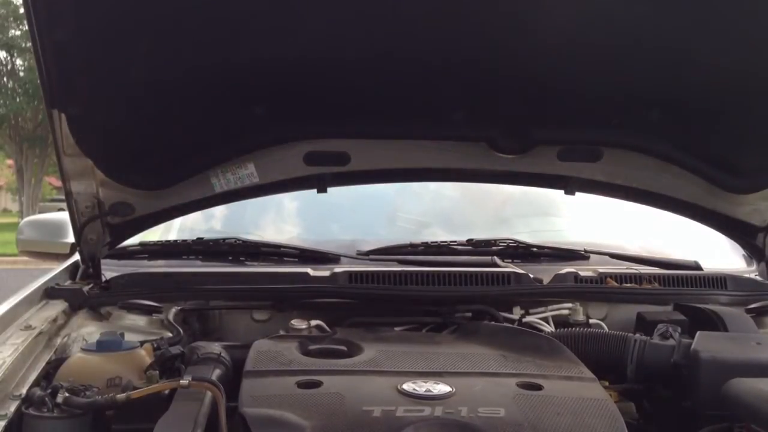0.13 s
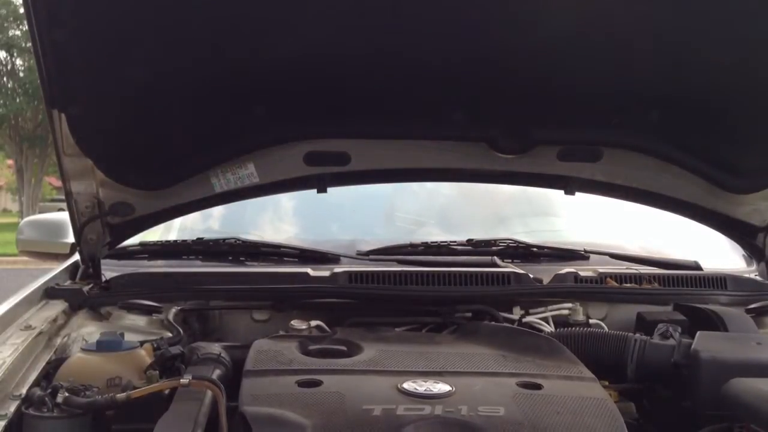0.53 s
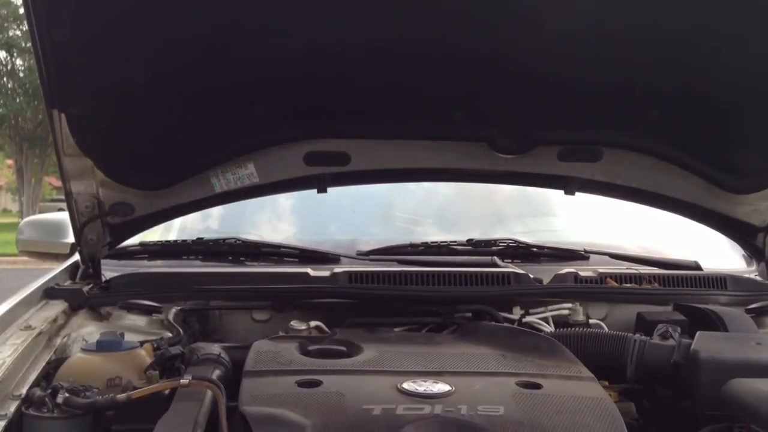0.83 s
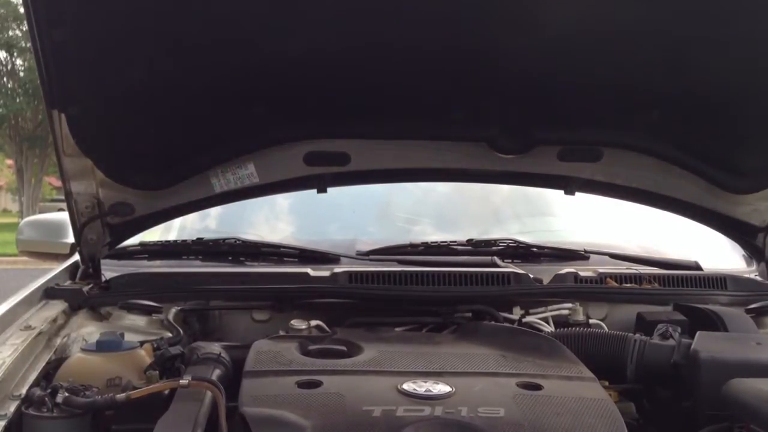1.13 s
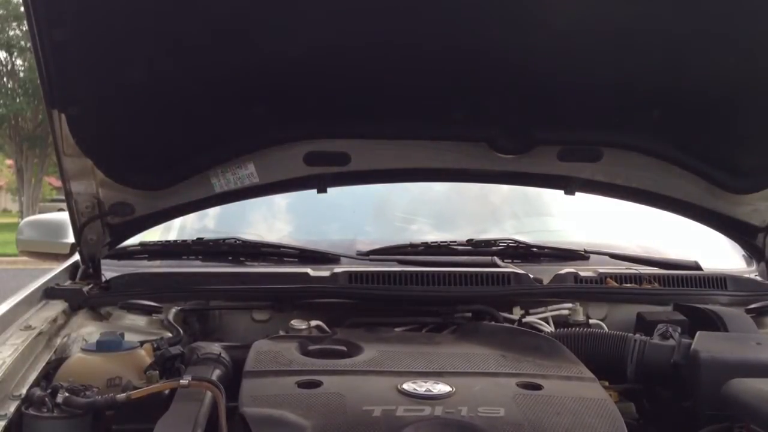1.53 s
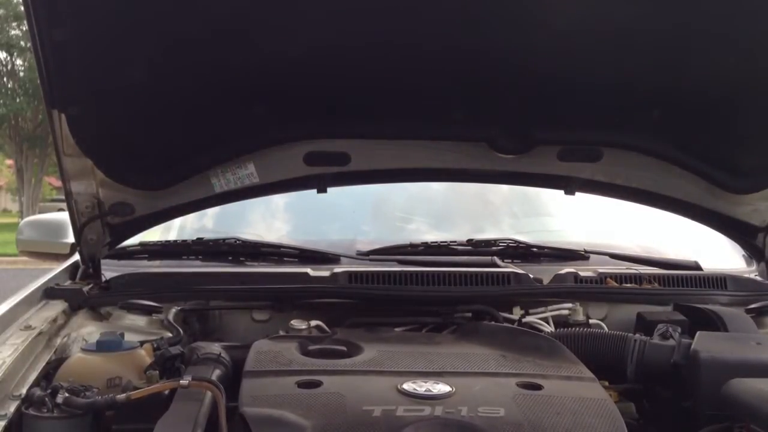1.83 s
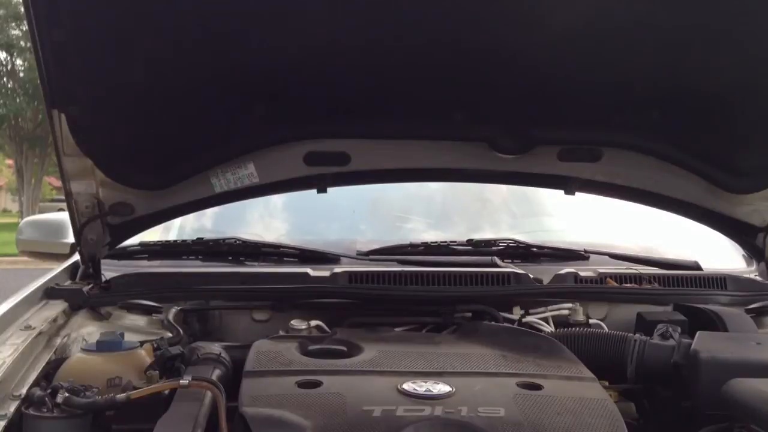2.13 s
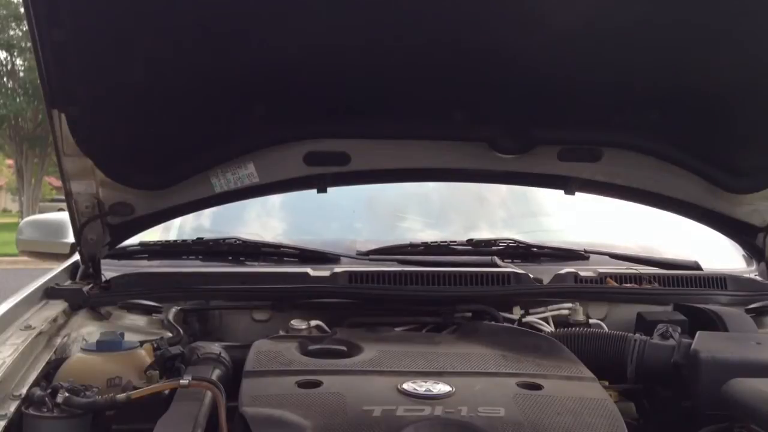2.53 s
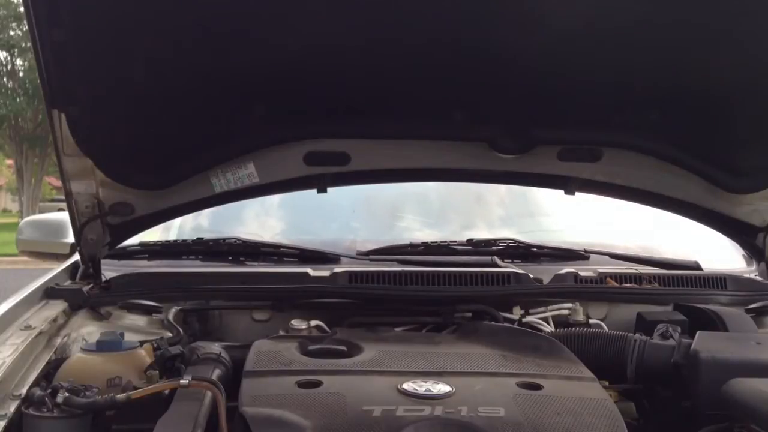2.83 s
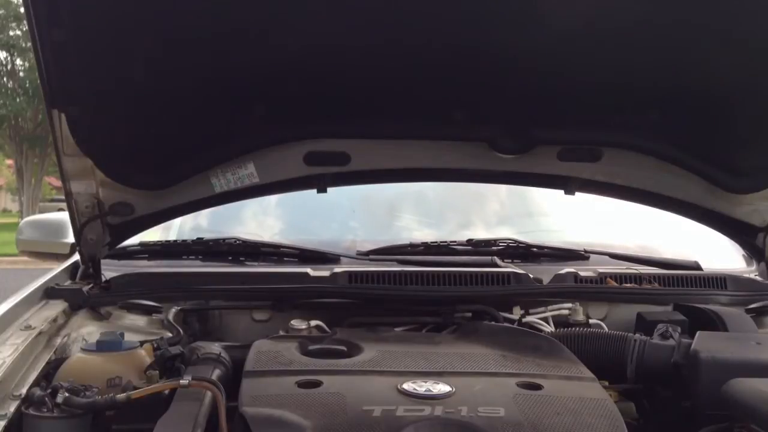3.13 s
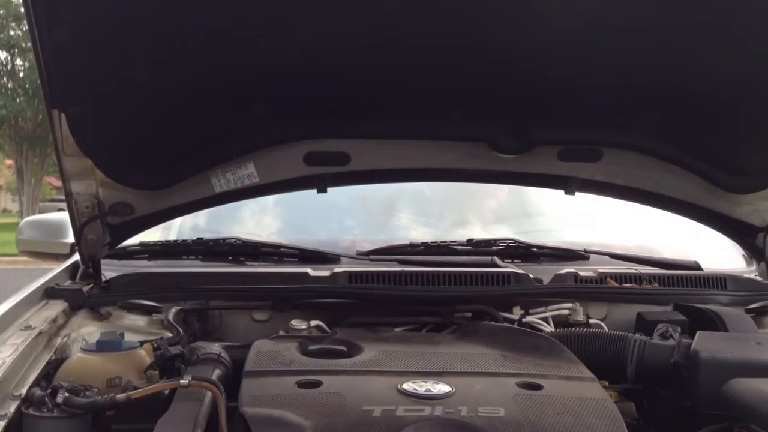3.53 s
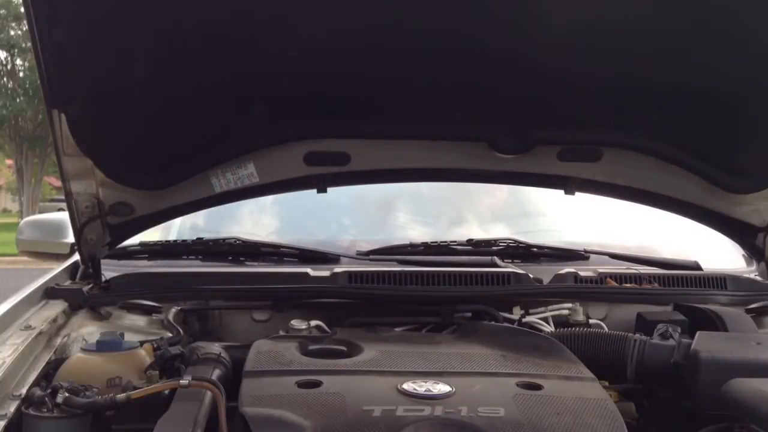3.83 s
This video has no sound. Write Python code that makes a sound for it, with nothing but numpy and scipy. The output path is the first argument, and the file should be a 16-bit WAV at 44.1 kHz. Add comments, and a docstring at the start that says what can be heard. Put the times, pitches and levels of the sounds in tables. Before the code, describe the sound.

A diesel car engine knocks close by, slowing until it stalls with a thin belt squeak and a jolt at about 0.6 seconds. At once the starter grinds in a loud, ringing metallic whir that runs down and stops short at 2 seconds. A latch clicks near 2.8 seconds. From about 2.5 seconds a small bird chirps very faintly over a quiet, distant outdoor hum.

```python
"""Diesel stall and grinding starter.

A four-cylinder diesel under an open bonnet knocks ever more slowly and stalls with a belt squeak
and a last jolt. The starter's teeth then grind on the ring gear, ringing the housing in a loud whir
that runs down and stops short; a latch clicks. A small bird calls over a low, distant hum."""
import sys
import numpy as np
from scipy import signal
from scipy.fft import rfft, irfft
from scipy.io import wavfile
from scipy.ndimage import uniform_filter1d

SR = 44100
rng = np.random.default_rng(int(sys.argv[2]) if len(sys.argv) > 2 else 0)


def store_pcm(level_fs):
    """Save levels as 16-bit WAV."""
    pcm = np.round(np.clip(level_fs, -1, 1) * 32767).astype(np.int16)
    wavfile.write(sys.argv[1], SR, np.atleast_2d(pcm).T)


N = 176400
TIME_S = np.arange(N) / SR


def amp(db):
    """Decibels to gain."""
    return 10 ** (np.asarray(db) / 20)


def unit(x):
    """Scale to rms 1."""
    return x / np.sqrt(np.mean(x ** 2))


def noise():
    """White noise."""
    return rng.standard_normal(N)


def walk(rate_hz):
    """Smooth random drift, rms 1."""
    step = max(int(SR / rate_hz), 1)
    held = np.repeat(rng.standard_normal(N // step + 1), step)
    return unit(uniform_filter1d(held, step)[:N])


def curve(rows, column=1):
    """Table column, linearly interpolated in time."""
    rows = np.array(rows, float)
    return np.interp(TIME_S, rows[:, 0], rows[:, column])


def swell(at_s, rise_s, fall_s):
    """Exponential rise to a peak, then exponential decay."""
    t = TIME_S - at_s
    return np.exp(np.minimum(t / rise_s, -t / fall_s))


def fade_out(at_s, over_s=.039):
    """Smooth step from 1 to 0."""
    return .5 - .5 * np.tanh((TIME_S - at_s) / (2 * over_s))


def cycles(hz, waver, waver_hz):
    """Running cycle count of a frequency that drifts by the fraction `waver`."""
    return np.cumsum(hz * (1 + waver * walk(waver_hz))) / SR


def sine(turns):
    """Sine of a phase in cycles, rms 1."""
    return unit(np.sin(2 * np.pi * turns))


def clatter(per_s=5000, scatter_db=4.5):
    """Dense small impacts of uneven size."""
    impacts = (rng.random(N) < per_s / SR) * np.sign(noise())
    return unit(impacts * amp(scatter_db * noise()))


def cut(x, hz, kind):
    """Butterworth high-pass or low-pass."""
    return signal.sosfilt(signal.butter(4, hz, kind, fs=SR, output="sos"), x)


def through(x, response):
    """Convolve with an impulse response scaled to unit energy."""
    return signal.fftconvolve(x, response / np.linalg.norm(response))[:N]


def colour(x, points, size=4096):
    """Minimum-phase filter through (frequency [Hz], relative gain [dB]) points, rolled off below."""
    hz, db = np.array(points, float).T
    f = np.maximum(np.arange(size // 2 + 1) * SR / size, 1)
    gain = amp(np.interp(np.log(f), np.log(hz), db)) * np.minimum(f / hz[0], 1) ** 3
    cepstrum = irfft(np.log(gain + 1e-6))
    cepstrum[1:size // 2] *= 2
    cepstrum[size // 2:] = 0
    return through(x, irfft(np.exp(rfft(cepstrum))))


def ring(x, modes):
    """Drive damped (frequency [Hz], width [Hz], relative gain [dB]) modes."""
    t = TIME_S[:SR // 3]
    response = sum((-1) ** k * amp(db) * width * np.exp(-np.pi * width * t) * np.sin(2 * np.pi * hz * t)
                   for k, (hz, width, db) in enumerate(modes))
    return through(x, response)


def ringing_noise(modes):
    """Noise-driven modes, rms 1."""
    return unit(ring(noise(), modes))


def band(hz, width_hz):
    """One noise-driven resonance, rms 1."""
    return ringing_noise([(hz, width_hz, 0)])


def echoes(x, t60_s, wet_db):
    """Direct sound plus a dense decaying tail of reflections."""
    t = TIME_S[:SR // 2]
    tail = noise()[:len(t)] * np.exp(-np.log(1000) * t / t60_s) * (t > .002)
    return (x + amp(wet_db) * through(x, tail)) / np.hypot(1, amp(wet_db))


def engine_bay(impacts, t60_s=.052, wet_db=-.5):
    """The bay smears each impact into its own short burst of reflections."""
    fade = np.exp(-2 * np.log(1000) * TIME_S[:SR // 4] / t60_s)
    energy = np.abs(signal.fftconvolve(impacts ** 2, fade / fade.sum())[:N])
    return (impacts + amp(wet_db) * np.sqrt(energy) * noise()) / np.hypot(1, amp(wet_db))


# open-air spectrum (frequency [Hz], gain [dB])
AIR_SPECTRUM = [(30, -28.5), (70, -8), (120, -10.5), (200, -4), (340, -3), (460, -4.5), (800, -10),
                (1900, -18), (4300, -21), (5000, -23), (15000, -27)]
# distant hum (frequency [Hz], width [Hz], level [dB])
DISTANT_HUM = [(162.5, 6.8, -60.5), (228.5, 7.5, -60.5)]


def outdoors(air_db=-60, flicker_db=.6):
    """Open-air rumble with a wavering two-note hum."""
    air = amp(air_db - flicker_db * walk(4.5)) * colour(noise(), AIR_SPECTRUM)
    hum = sum(amp(db) * unit(cut(band(hz, width), 120, "high")) for hz, width, db in DISTANT_HUM)
    return air + hum


# calls (time [s], length [s], start pitch [Hz], target pitch [Hz], level [dB])
BIRD_CALLS = [(2.47, .085, 2650, 3380, -63.5), (2.615, 0.12, 2570, 3480, -61),
              (2.86, 0.05, 4270, 3950, -67), (3.03, .06, 4550, 4250, -65.5),
              (3.285, .055, 4500, 4050, -66.5), (3.47, 0.061, 4450, 4250, -66.5),
              (3.65, 0.058, 4500, 4170, -65), (3.835, 0.064, 4510, 4150, -67)]


def bird(glide=.39, rasp=.033):
    """Two rising calls, then short falling chips, raspy and blurred by trees and walls."""
    song = np.zeros(N)
    for at, length, start_hz, target_hz, db in BIRD_CALLS:
        progress = np.clip((TIME_S - at) / length, 0, 1)
        hz = target_hz + (start_hz - target_hz) * np.exp(-progress / glide)
        song += amp(db) * np.sin(np.pi * progress) * np.sin(2 * np.pi * cycles(hz, rasp, 700))
    return echoes(song, t60_s=.25, wet_db=-2.5)


# clicks (time [s], body [dB], tick [dB], decay [s], ring [dB])
LATCH_CLICKS = [(2.755, -54, -65, 0.013, -55), (2.7922, -37, -54, 0.014, -44),
                (2.821, -60, -53, 0.017, -75)]
# latch body (frequency [Hz], gain [dB])
LATCH_SPECTRUM = [(200, -14), (330, 4.5), (450, -4), (620, 6), (850, -18), (1300, -15), (1720, -8),
                  (2200, -10), (2800, -4.5), (3900, -7.5), (4600, -4), (5300, -17), (6500, -21)]
# latch metal (frequency [Hz], width [Hz], gain [dB])
LATCH_MODES = [(1734, 45, -7), (4110, 90, -2), (4660, 51, -2)]


def latch(rise_s=.00035, rattle_db=-15, rattle_s=.026, ring_s=.0092):
    """A soft touch, a sharp click with a short metallic ring, and a bright rebound."""
    body, tick, metal = np.zeros((3, N))
    for at, body_db, tick_db, decay_s, ring_db in LATCH_CLICKS:
        strike = swell(at, rise_s, decay_s)
        body += amp(body_db) * (strike + amp(rattle_db) * swell(at, rise_s, rattle_s))
        tick += amp(tick_db) * strike
        metal += amp(ring_db) * swell(at, rise_s, ring_s)
    return (metal * ringing_noise(LATCH_MODES)
            + cut(colour(body * noise(), LATCH_SPECTRUM), 5430, "low")
            + colour(tick * noise(), [(7500, 0), (10500, -1), (15000, -9)]))


# panel hum (time [s], level [dB])
PANEL_LEVEL = [(1.1, -90), (1.24, -40), (1.3, -35), (1.37, -39), (1.45, -60), (1.6, -40), (1.7, -40),
               (1.8, -90)]


def panel(pitch_hz=736):
    """A panel hums at its own pitch while the gear coasts."""
    return amp(curve(PANEL_LEVEL)) * sine(cycles(pitch_hz, waver=.01, waver_hz=100))


# belt squeak (time [s], pitch [Hz], level [dB])
BELT_SQUEAK = [(.36, 5800, -66), (.41, 5755, -44), (.5, 5680, -42), (.57, 5660, -37.5), (.6, 5600, -56.5),
               (.62, 5660, -100)]
# whine of the belt-driven parts (time [s], pitch [Hz], level [dB])
BELT_WHINE = [(0, 409.6, -40.5), (.07, 399, -29), (.15, 367.3, -37), (.2, 340.2, -48.5), (.3, 297, -38.5),
              (.45, 240, -59.5), (.55, 205, -100)]


def belt(octave_db=-15):
    """The belt drive whines down and squeaks unsteadily as it drags to a halt."""
    turns = cycles(curve(BELT_SQUEAK), waver=.009, waver_hz=700)
    squeak = unit(sine(turns) + amp(octave_db) * sine(2 * turns))
    whine = sine(cycles(curve(BELT_WHINE), waver=.043, waver_hz=90))
    return amp(curve(BELT_SQUEAK, column=2)) * squeak + amp(curve(BELT_WHINE, column=2)) * whine


# block on its mounts (time [s], level [dB])
MOUNT_THUMPS = [(.1, -37.5), (.135, -36), (.215, -41), (.25, -35), (.375, -45), (.52, -42), (.587, -33),
                (.612, -33.5), (.825, -33.5)]
# loose parts (time [s], pitch [Hz], width [Hz], level [dB])
LOOSE_CLUNKS = [(.267, 905, 70, -23), (.313, 2650, 250, -25.5), (.346, 2400, 500, -40),
                (.442, 1200, 300, -37.5), (.459, 1200, 250, -27), (.503, 1300, 300, -35),
                (.509, 2700, 400, -33.5), (.532, 1200, 300, -26), (.61, 1300, 611.4, -28)]


def mounts(thump_hz=182.6, thump_width_hz=38):
    """The stalling block rocks: its mounts thump and loose parts clunk."""
    force = sum(amp(db) * swell(at, rise_s=.009, fall_s=.025) for at, db in MOUNT_THUMPS)
    thumps = force * unit(cut(band(thump_hz, thump_width_hz), 115, "high"))
    clunks = sum(amp(db) * swell(at, rise_s=.0034, fall_s=.0091) * band(hz, width)
                 for at, hz, width, db in LOOSE_CLUNKS)
    return thumps + clunks


# final clack (frequency [Hz], gain [dB])
CLACK_SPECTRUM = [(250, -15), (700, 6), (1400, 3), (2800, 1), (3700, -12), (5200, -3), (7500, -28),
                  (10000, -11), (12000, -34)]


def gear_stop(squeal_db=-46, clack_db=-39.5):
    """The slowing gear squeals thinly, then comes to rest with a dry clack."""
    squeal = amp(squeal_db) * swell(at_s=1.921, rise_s=.04, fall_s=.013) * band(9200, width_hz=160)
    clack = amp(clack_db) * swell(at_s=2.028, rise_s=.006, fall_s=.013) * noise()
    return squeal + colour(clack, CLACK_SPECTRUM)


# singing of the gear (time [s], level [dB])
SINGING_LEVEL = [(.62, -75), (.66, -26.5), (.75, -27.5), (.85, -29.5), (.9, -27), (.97, -25.5), (1.06, -27),
                 (1.115, -24), (1.142, -25.5), (1.165, -19), (1.18, -26), (1.2, -35), (1.5, -45),
                 (1.84, -38.5), (1.875, -36), (1.9, -47), (2.07, -100)]
# singing modes (frequency [Hz], gain [dB])
SINGING_MODES = [(1260, -2.5), (1932, -8)]
# growl of the first, hardest contact (time [s], level [dB])
GROWL_LEVEL = [(.63, -70.5), (.66, -23.5), (.74, -22.5), (.83, -23), (.88, -25.5), (.93, -26.5),
               (1.08, -27), (1.17, -34.5), (1.2, -51), (1.25, -100)]
# growl modes (frequency [Hz], width [Hz], gain [dB])
GROWL_MODES = [(590, 55, -7.5), (990, 64, 1.5), (1041, 30, -7), (1330, 45, -4), (1670, 30, -7),
               (1940, 35, 2.5), (2292, 42, -3.5), (2600, 50, -5.5), (2690, 30, -1.5), (2830, 37, -4.5),
               (3073, 25, -3), (3213, 40, -4.5), (4260, 120, -10), (5084, 270, -14.5)]
# hiss of the spinning gear (time [s], level [dB])
HISS_LEVEL = [(.61, -91.5), (.65, -38.5), (1, -40), (1.3, -48), (1.6, -48), (1.85, -56), (1.92, -60),
              (1.97, -74), (2.07, -100)]
# hiss modes (frequency [Hz], width [Hz], gain [dB])
HISS_MODES = [(6980, 110, -2.5), (6980, 70, -4.5), (9060, 200, -0.5), (10050, 400, -7.5)]


def gear_singing(flutter_db=2.5):
    """Rubbing sustains the gear's modes, each wavering on its own, over a growl and a metallic hiss."""
    tones = np.zeros(N)
    for hz, db in SINGING_MODES:
        tone = sine(cycles(hz, waver=.008, waver_hz=200))
        tones += amp(db + flutter_db * walk(160)) * tone
    growl = amp(curve(GROWL_LEVEL)) * ringing_noise(GROWL_MODES)
    hiss = amp(curve(HISS_LEVEL)) * ringing_noise(HISS_MODES)
    return amp(curve(SINGING_LEVEL)) * unit(tones) + growl + hiss


# engine-bay cavities (frequency [Hz], width [Hz], gain [dB])
CAVITY_MODES = [(576, 41, -2.5), (774, 12, -3.5)]


def cavity_boom(teeth, hits, force, jitter_teeth=.09, force_limit_db=-31.5):
    """Mesh harmonics and tooth hits sound the bay's cavities until the mesh is slow."""
    harmonics = sum(sine(k * (teeth + jitter_teeth * walk(150))) for k in (2, 3))
    boom = amp(-10.5) * unit(ring(harmonics, CAVITY_MODES))
    rumble = amp(-14) * ring(hits, CAVITY_MODES)
    return np.minimum(force, amp(force_limit_db)) * (boom + rumble) * fade_out(at_s=1.856)


# hum at the tooth rate (time [s], level [dB])
MESH_LEVEL = [(.61, -72), (.635, -35), (.68, -25.5), (.705, -30.5), (.76, -24.5), (.8, -36.5), (.83, -23),
              (.86, -46), (.885, -33), (.905, -27), (.955, -31), (.98, -26.5), (1.01, -32), (1.085, -26),
              (1.13, -30), (1.22, -36), (1.5, -38.5), (1.66, -38), (1.795, -49), (1.82, -38), (1.895, -39),
              (1.915, -53), (2.07, -92)]
# its third harmonic (time [s], level [dB])
THIRD_LEVEL = [(1.4, -90), (1.5, -39), (1.62, -44), (1.67, -35), (1.71, -37.5), (1.755, -33.5),
               (1.785, -54), (1.84, -55), (1.87, -45), (1.91, -43), (1.93, -68), (2.07, -100)]


def mesh_hum(teeth, flutter_db=1.5, jitter_teeth=.025):
    """The mesh hums at the tooth rate; its third harmonic stands out as the gear coasts."""
    hum = amp(curve(MESH_LEVEL) + flutter_db * walk(90)) * sine(teeth)
    third = amp(curve(THIRD_LEVEL)) * sine(3 * (teeth + jitter_teeth * walk(150)))
    return hum + third


# starter speed (time [s], tooth rate [Hz])
TOOTH_RATE = [(.62, 320), (.68, 324), (.745, 366), (.79, 317), (.825, 347), (.87, 307), (.93, 330),
              (.975, 325), (1.04, 320), (1.13, 314), (1.2, 302), (1.26, 305), (1.45, 301), (1.55, 274),
              (1.65, 270), (1.77, 237), (1.83, 196), (1.885, 203), (1.915, 176), (2.06, 129)]
# grinding force (time [s], level [dB])
GRIND_FORCE = [(.61, -90), (.632, -25), (.652, -20), (.8, -20), (.9, -21.5), (1.08, -21.5), (1.14, -24.5),
               (1.165, -22.5), (1.19, -24.5), (1.45, -25), (1.68, -27), (1.78, -31), (1.88, -34.5),
               (1.95, -37.5), (2.01, -43.5), (2.045, -44.5), (2.07, -79), (2.1, -110)]
# ring gear and bell housing (frequency [Hz], width [Hz], gain [dB])
HOUSING_MODES = [(908, 56, -8.5), (996, 27, -3.5), (1031.5, 30, -3.5), (1217, 37, 1.5), (1361, 30, -7),
                 (1478, 35, -2), (1703, 42, -3), (1973, 40, -3), (2023, 36, -2.5), (2303, 86, 1),
                 (2615, 26, -3.5), (2707, 24, -3.5), (2872, 40, -5.5), (3090, 23, -6.5), (3205, 32, -9),
                 (4240, 81, -16.5), (4800, 70, -12), (5270, 50, -9)]
# tooth scrape (frequency [Hz], gain [dB])
SCRAPE_SPECTRUM = [(130, -28.5), (190, -20.5), (330, -7.5), (480, -15), (680, -14.5), (1100, -5),
                   (1800, -9), (2700, -10.5), (3500, -15), (5200, -14), (6400, -18.5), (9600, -22.5),
                   (11500, -28), (15000, -37.5)]


def starter(jitter_teeth=.16, flutter_db=.7, chatter_db=7.5, housing_db=-2, scrape_db=-3.5):
    """Teeth strike and chatter on the ring gear and ring the housing; the last slow ones only scrape."""
    teeth = cycles(curve(TOOTH_RATE), waver=.028, waver_hz=120)
    uneven_teeth = np.maximum.accumulate(teeth + jitter_teeth * walk(300))
    hits = unit(np.diff(np.floor(uneven_teeth), prepend=0) > 0)
    force = amp(curve(GRIND_FORCE) + flutter_db * walk(50))
    blows, rasp = (force * unit(hits + amp(chatter_db) * clatter(per_s=2500, scatter_db=1.5))
                   for _ in range(2))
    housing = amp(housing_db) * ring(blows * fade_out(at_s=2), HOUSING_MODES)
    scrape = amp(scrape_db) * colour(engine_bay(rasp), SCRAPE_SPECTRUM)
    return housing + scrape + mesh_hum(teeth) + cavity_boom(teeth, hits, force)


# compression strokes (time [s], level [dB], relative treble [dB], relative ring [dB], knock decay [s])
STROKES = [(.003, -13.5, -5.5, -6.5, 0.0089), (0.033, -21, -4, -8.5, 0.0073), (0.062, -16, -5, 1, 0.0072),
           (0.092, -16.5, -2, -8.5, 0.018), (0.121, -16.5, 0.5, -2.5, 0.0071), (0.149, -17.5, 3, 1.5, .01),
           (0.178, -20, -8, 3, 0.013), (0.211, -20.5, 5, 7.5, 0.0049), (0.245, -18.5, -3.5, -1, .01),
           (0.282, -25, 5, 4.5, 0.005), (.318, -21, 0, 2, 0.019), (0.359, -23.5, -1, 9, 0.011),
           (0.406, -21.5, 1, 2.5, 0.0089), (0.458, -18.5, -7.5, 2.5, 0.011),
           (0.519, -19.5, -4.5, -2, 0.0079), (.581, -12.5, -7, 2, 0.0098)]
# valve gear and belts between strokes (time [s], level [dB])
CHURN_LEVEL = [(0, -22), (.15, -28.5), (.3, -27.5), (.45, -28.5), (.55, -32.5), (.62, -27.5), (.68, -48),
               (.72, -100)]
# impacts in the block (frequency [Hz], gain [dB])
BLOCK_SPECTRUM = [(59, -50.5), (100, -19.5), (176, -9), (274, -9.5), (375, -2), (482, -4.5), (535, -2.5),
                  (748, -4), (831, -6.5), (983, 1), (1140, -5.5), (1240, -1), (1840, -6.5), (2750, -7),
                  (3610, -12), (4940, -6), (6090, -13), (10100, -17), (15000, -33)]
# block and panels (frequency [Hz], width [Hz], gain [dB])
BLOCK_MODES = [(559.4, 20, -0.5), (764, 33, -1.5), (1080, 180, -7.5), (1173, 44, -1), (2007, 28, -0.5),
               (2303, 110, 1.5), (2630, 50, 3.5), (2894, 110, 1.5), (3390, 41, -4), (5000, 49, -4),
               (7180, 200, -12)]
# engine cover (frequency [Hz], width [Hz], gain [dB])
COVER_MODES = [(2960, 140, -5.5), (4136, 90, -4), (4930, 66, 0.5), (5280, 100, -3.5), (7240, 150, -11)]


def diesel(rise_s=.0048, clang_lead_s=.0023, crossover_hz=3560, treble_db=3):
    """Each stroke shakes out a swarm of impacts and rings block and cover; valve gear churns between."""
    knock, crack, clang = np.zeros((3, N))
    for at, db, crack_db, ring_db, decay_s in STROKES:
        knock += amp(db) * swell(at, rise_s, decay_s)
        crack += amp(db + crack_db) * swell(at, rise_s=.0013, fall_s=.013)
        clang += amp(db + ring_db) * swell(at - clang_lead_s, rise_s, fall_s=.0071)
    body, treble, churn = (colour(engine_bay(clatter() * force), BLOCK_SPECTRUM)
                           for force in (knock, crack, amp(curve(CHURN_LEVEL))))
    body = cut(body, crossover_hz, "low")
    treble = amp(treble_db) * cut(treble, crossover_hz, "high")
    churn = amp(-2) * colour(churn, [(50, 0), (3200, 0), (4500, -1)])
    block = amp(-4) * ring(clatter() * clang, BLOCK_MODES)
    cover = amp(-6) * ring(clatter() * crack, COVER_MODES)
    return body + treble + churn + block + cover


def scene():
    """The machinery under the bonnet, thin in the bass, with the open air behind it."""
    engine = diesel() + mounts() + belt()
    grinding = starter() + gear_singing() + panel() + gear_stop()
    car = cut(engine + grinding + latch(), 125, "high")
    return (car + bird() + outdoors())[None]


def record(dry, top_hz=15450):
    """Steep low-pass on the top treble."""
    return signal.sosfilt(signal.ellip(10, .2, 80, top_hz, fs=SR, output="sos"), dry)


dry = scene()
out = record(dry)
store_pcm(out)
```